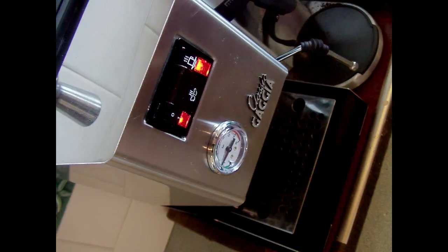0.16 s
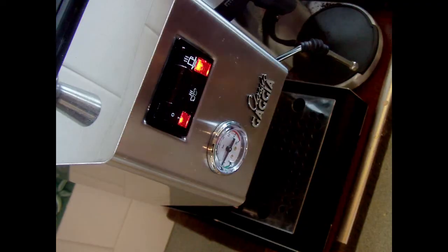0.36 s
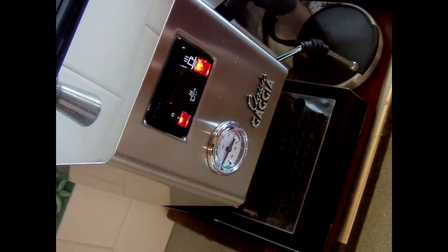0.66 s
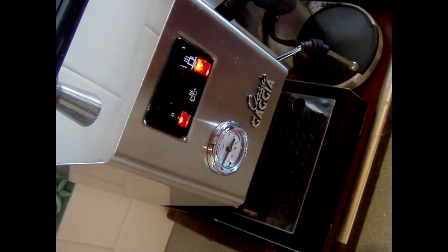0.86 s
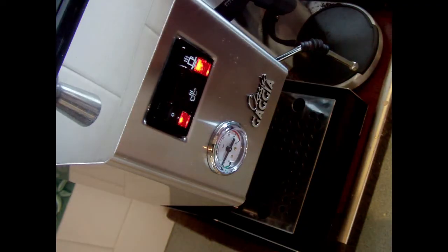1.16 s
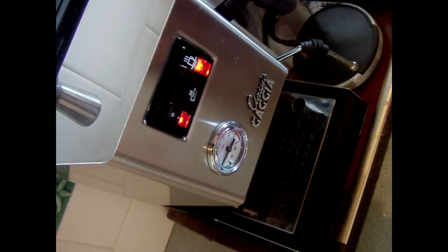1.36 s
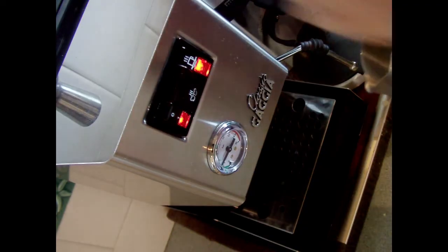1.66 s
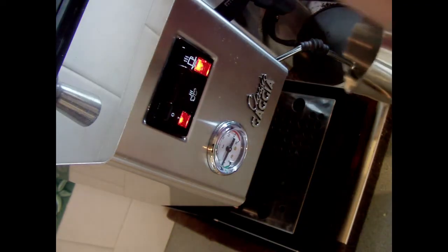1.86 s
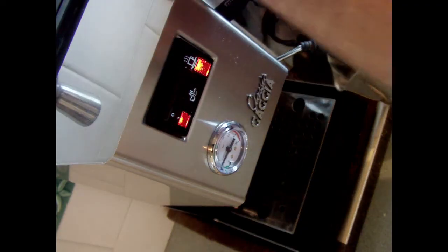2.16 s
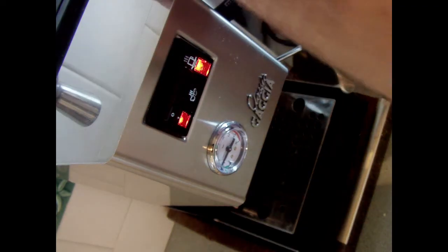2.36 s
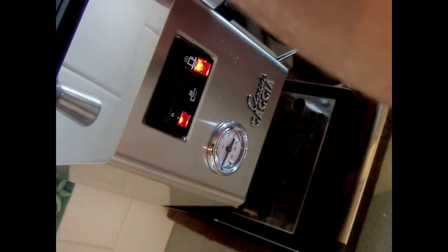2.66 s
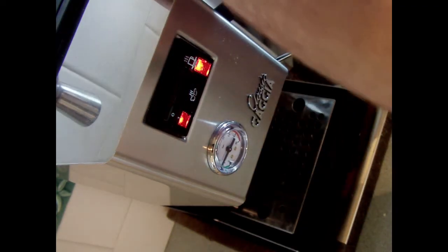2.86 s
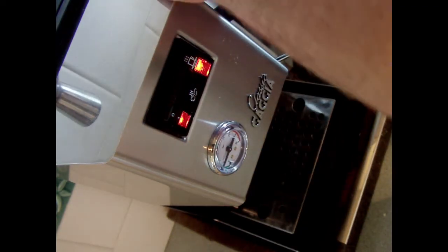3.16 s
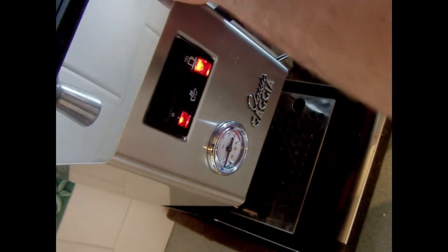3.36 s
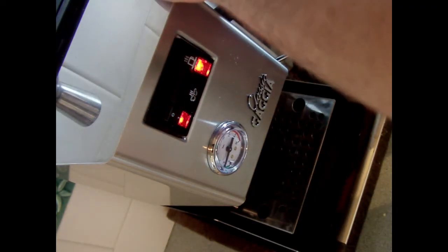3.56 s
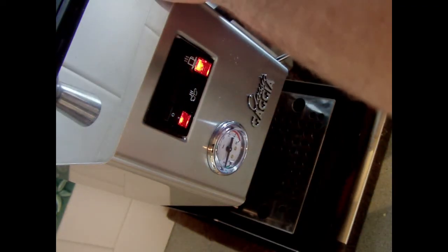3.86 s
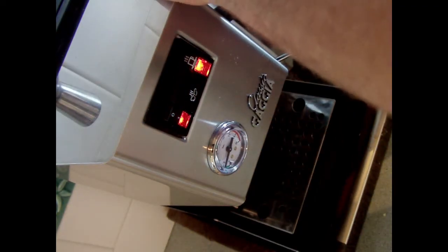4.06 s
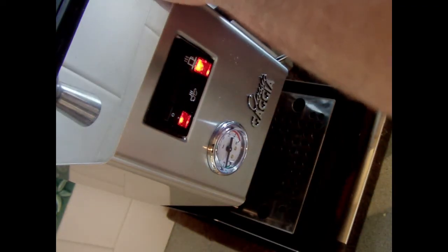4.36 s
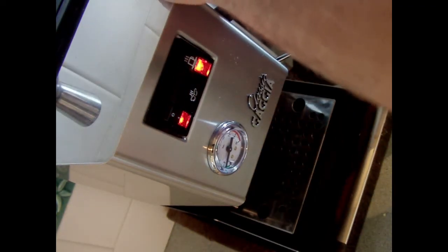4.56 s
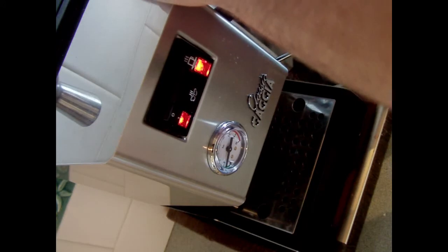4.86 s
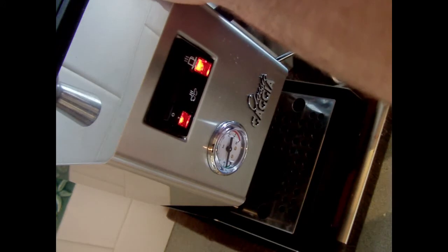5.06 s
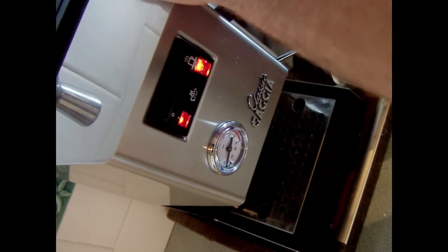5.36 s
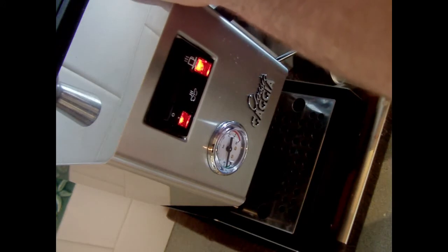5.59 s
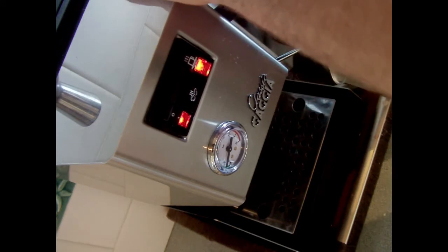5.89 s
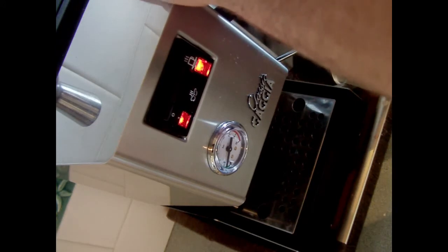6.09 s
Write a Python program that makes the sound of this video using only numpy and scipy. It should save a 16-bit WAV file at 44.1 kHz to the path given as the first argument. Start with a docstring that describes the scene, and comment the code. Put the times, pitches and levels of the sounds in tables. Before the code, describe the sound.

A quiet home kitchen with soft room noise. Faint clicks and dull knocks come first, then a brighter steel clink and a short scrape. A valve snaps and steam bursts into milk in a metal jug: choppy wet spits, shrieks and gurgles. The wand sinks and the sound becomes a dense rattle that softens, with hiss surging back near the end. Very close, nearly mono microphone, short room echo.

```python
"""Steam wand frothing milk

A steam wand froths milk in a steel jug in a kitchen, close up and nearly mono.
Filtered clatter and decaying steel modes knock; gated noise and darting resonances spit and hiss.
Clicks and short pips rattle as steam bubbles collapse in cold milk; clicks and noise drum on the jug's air.
Wobbling sines make large bubbles, filtered noise the quiet background, sparse echoes the kitchen."""
import sys
import numpy as np
from scipy import signal
from scipy.fft import rfft, irfft
from scipy.io import wavfile
from scipy.ndimage import uniform_filter1d, map_coordinates

SR = 44100
rng = np.random.default_rng(int(sys.argv[2]) if len(sys.argv) > 2 else 0)


def wrap_up_sound(samples):
    """Save the sound to the file named by the first command line argument, as 16-bit audio."""
    columns = np.atleast_2d(samples).T
    # keep every value between -1 and 1, then stretch to whole-number steps
    tamed = np.clip(columns, -1, 1)
    steps = np.round(tamed * 32767).astype(np.int16)
    wavfile.write(sys.argv[1], SR, steps)


N = 274743
T = np.arange(N) / SR
HZ = np.fft.rfftfreq(4096, 1 / SR)


def amp(db):
    """Decibels to gain."""
    return 10 ** (np.asarray(db) / 20)


def evened(x):
    """Scales to rms 1."""
    return x / np.sqrt(np.mean(x ** 2) + 1e-20)


def read(points, hz):
    """Interpolates a table on a log-frequency axis."""
    f, value = np.transpose(points)
    return np.interp(np.log(hz + 1), np.log(f + 1), value)


def add(mix, s, sound):
    """Mixes a sound in at time s."""
    part = mix[round(s * SR):][:len(sound)]
    part += sound[:len(part)]


def colour(x, db):
    """Minimum-phase filter shaped by dB on the HZ grid; the result has rms 1."""
    log_gain = np.log(amp(np.r_[db, db[-2:0:-1]]) + 1e-5)
    taps = np.fft.ifft(np.exp(np.conj(signal.hilbert(log_gain)))).real
    causal_taps = taps[:len(taps) // 2]
    return evened(signal.oaconvolve(x, causal_taps)[:len(x)])


def noise():
    """White noise over the whole scene."""
    return rng.standard_normal(N)


def wander(rate_hz):
    """Smooth random drift of rms 1, mostly slower than the given rate."""
    keep = 1 / (1 + (np.fft.rfftfreq(N, 1 / SR) / rate_hz) ** 4)
    return evened(irfft(rfft(noise()) * keep, N))


def flutter(rate_hz, depth_db):
    """Random gain of mean power 1."""
    return evened(amp(depth_db * 2 * np.tanh(wander(rate_hz) / 2)))


def swells(rows):
    """Gain of bell-shaped swells, from rows of middle, half length and dB."""
    return sum(amp(db) * np.exp(-((T - s) / half) ** 2) for s, half, db in rows)


def pops(per_s, spread_db):
    """Random clicks of uneven size and sign, rms 1."""
    size = amp(spread_db * np.minimum(rng.exponential(1, N), 3))
    sign = rng.choice([-1, 1], N)
    return evened(size * sign * (rng.random(N) < per_s / SR))


def squelch(centre_hz, octaves, width_hz):
    """A pocket swells and shrinks, so its narrow-band resonance darts up and down."""
    hz = centre_hz * 2 ** (octaves * np.tanh(wander(rate_hz=52)))
    return evened(wander(width_hz / 2) * np.cos(2 * np.pi * np.cumsum(hz) / SR))


def slosh(x, depth, rate_hz):
    """The milk heaves, so the resonances above it drift a little up and down."""
    positions = np.arange(N) + np.cumsum(depth * wander(rate_hz))
    return map_coordinates(x, [positions], order=3, mode="mirror")


# Air above the milk. Each row: resonance in Hz, width in Hz, boost in dB.
JUG_AIR_MODES = [(1755, 115, 6.5), (2595, 110, 5.5), (3694, 74, 5.5), (4090, 174, 8), (4760, 130, -1.5),
                 (5360, 310, 6)]


def in_jug(x, points):
    """A source's own colour, boosted at the resonances of the air in the jug."""
    air_db = sum(db / (1 + ((HZ - hz) / width) ** 2) for hz, width, db in JUG_AIR_MODES)
    return colour(x, read(points, HZ) + air_db)


# Kitchen noise spectrum. Each row: frequency in Hz, relative density in dB per Hz.
QUIET_COLOUR = [(30, -42), (100, -25.5), (200, -19.5), (330, -9), (600, -3), (1150, -2), (2200, -6),
                (5000, -18), (15500, -29)]
# Faint wide background noise. Each row: frequency in Hz, relative density in dB per Hz.
SIDE_NOISE_SPECTRUM = [(30, -9), (150, -10), (260, -6), (450, -35), (2500, -17), (6000, -8), (15000, -1.5)]
QUIET_DB, SIDE_NOISE_DB = -58.5, -75.5
WHINE_HZ, WHINE_PEAK_DB = 8000, -82.5


def background():
    """Steady filtered noise, a faint electronic sine whine and faint wide noise, opposite in left and right."""
    quiet = amp(QUIET_DB) * colour(noise(), read(QUIET_COLOUR, HZ))
    whine = amp(WHINE_PEAK_DB) * np.sin(2 * np.pi * WHINE_HZ * T)
    side_noise = amp(SIDE_NOISE_DB) * colour(noise(), read(SIDE_NOISE_SPECTRUM, HZ))
    return quiet + whine + side_noise * np.array([[1], [-1]])


# Jug wall modes. Each row: frequency in Hz, level in dB, t60 in seconds.
STEEL_MODES = [(1146, 3, 0.053), (1346, -6.5, 0.84), (2035, -14, 0.4), (2190, -7, 0.25), (3025, -3, 0.18),
               (3520, 0, 0.21), (3983, 1, 0.17), (4240, -6, 0.18), (4765, -1, 0.2), (4900, 9, 0.044)]


def steel(t):
    """The ring of the jug wall after a blow: a sum of decaying modes."""
    return sum(amp(db - 60 * t / t60) * np.sin(2 * np.pi * hz * t) for hz, db, t60 in STEEL_MODES)


# Knocks of jug, wand and valve.
# Each row: start in seconds, level in dB, centre in Hz, width in octaves, clatter t60 in seconds.
KNOCK_EVENTS = [(0.354, -45.5, 1470, 0.5, 0.08), (1.18, -53, 480, 0.78, 0.13),
                (1.192, -48.5, 510, 0.8, 0.19), (1.232, -45.5, 510, 0.67, 0.086),
                (1.203, -61.5, 8050, 0.65, 0.068), (1.413, -50, 2580, 0.22, 0.13),
                (2.17, -44, 4320, 0.71, 0.097), (2.486, -33, 3990, 0.96, 0.13),
                (2.487, -39, 1220, 0.51, 0.18), (2.574, -51, 8450, 0.46, 0.1),
                (2.83, -32.5, 2580, 0.26, 0.031)]
# The jug rubs against the wand. Each row: middle in seconds, half length in seconds, drive in dB.
RUB_SWELLS = [(2.335, 0.02, -54.5), (2.395, 0.035, -52)]
# The rubbed wall sings on one mode. Each row: middle in seconds, half length in seconds, level in dB.
SING_SWELLS = [(2.44, 0.049, -60)]
SING_HZ = 3025
# hard, bright blows ring the steel fully; duller ones ring it less
RING_DB, RING_HZ, RING_DB_PER_OCTAVE = -5.5, 4060, 20
SCRAPE_COLOUR = [(200, -20), (1600, 3.5), (5000, -15.5), (14000, -25)]  # Hz, relative dB per Hz


def handling():
    """Each knock is a short clatter plus ringing steel; sliding rubs the same modes."""
    out, t = np.zeros(N), np.arange(SR // 2) / SR
    ring = steel(t)
    onset = 1 - np.exp(-t / 0.00026)
    for s, db, hz, octaves, t60 in KNOCK_EVENTS:
        skirts = (np.log2((HZ + 1) / hz) / octaves) ** 4
        treble_loss = (HZ / hz / 0.99) ** 2
        band_db = -15 * np.log10(1 + skirts + treble_loss)
        clatter = colour(rng.standard_normal(len(t)), band_db) * amp(-60 * t / t60)
        ring_db = RING_DB + RING_DB_PER_OCTAVE * min(np.log2(hz / RING_HZ), 0)
        add(out, s, amp(db) * (clatter + amp(ring_db) * ring) * onset)
    rub = pops(per_s=1700, spread_db=-1.5)
    rubbed_steel = evened(signal.oaconvolve(rub, ring)[:N])
    scrape = amp(-11.5) * rubbed_steel + amp(1.5) * colour(rub, read(SCRAPE_COLOUR, HZ))
    singing = evened(np.sin(2 * np.pi * SING_HZ * T))
    return out + scrape * swells(RUB_SWELLS) + singing * swells(SING_SWELLS)


# The milk heaves and gulps air. Each row: middle in seconds, half length in seconds, level in dB.
GULP_SWELLS = [(2.86, 0.036, -52), (2.98, 0.051, -41.5), (3.19, 0.17, -40.5), (3.37, 0.085, -35),
               (3.9, 0.14, -49.5), (4.13, 0.035, -37), (4.95, 0.012, -45.5), (5.26, 0.049, -42),
               (5.53, 0.029, -41.5)]
# Drumming spectrum. Each row: frequency in Hz, relative density in dB per Hz.
CHURN_SPECTRUM = [(50, -32), (300, -32.5), (480, -29.5), (600, -12), (680, -19.5), (775, 5), (880, -0.5),
                  (980, -4), (1120, -2), (1250, -11), (2200, -15), (6000, -100)]
SIMMER_DB = -54  # churn that is always there while steam flows
JET_CHURN_DB = -7  # re jet_level()
GURGLE_HZ, GURGLE_DB = 786, -5  # wandering air-pocket resonance, level re the gulp


def churn():
    """Bursting air pockets drum on the hollow of the jug, harder with the jet; each gulp adds a gurgle."""
    drive = pops(per_s=500, spread_db=1.5) + amp(8) * noise()
    drive = drive * flutter(rate_hz=18.0, depth_db=4.0)
    gulps = swells(GULP_SWELLS)
    simmer = amp(SIMMER_DB) * valve()
    stirred = amp(JET_CHURN_DB) * jet_level()
    strength = np.sqrt(simmer ** 2 + stirred ** 2 + gulps ** 2)
    drumming = slosh(in_jug(drive, CHURN_SPECTRUM), depth=.02, rate_hz=4.987)
    gurgle = amp(GURGLE_DB) * gulps * squelch(GURGLE_HZ, octaves=0.11, width_hz=77)
    return strength * drumming + gurgle


# Air pushed out ahead of the steam. Each row: middle in seconds, half length in seconds, level in dB.
PUFF_SWELLS = [(2.87, 0.04, -55.5)]
# Wand air spectrum. Each row: frequency in Hz, relative density in dB per Hz.
WAND_SPECTRUM = [(300, -23), (1400, -6), (4300, -2), (7000, -8), (16000, -20)]
WAND_HZ, WAND_PEAK_DB = 1424, 23  # lowest tube resonance, boost at its overtones


def wand_air():
    """Air hisses through the wand, coloured by the overtones of its tube."""
    overtones_db = WAND_PEAK_DB * np.cos(np.pi * HZ / WAND_HZ) ** 10
    return swells(PUFF_SWELLS) * colour(noise(), read(WAND_SPECTRUM, HZ) + overtones_db)


# Wet spurts of steam. Each row: start in seconds, end in seconds, hiss drive in dB, shriek drive in dB,
# steam-pocket pitch at the start in Hz, pitch at the end in Hz.
SPURT_EVENTS = [(2.83, 2.838, -39, -25.5, 2580, 4600), (2.975, 3.005, -46.5, -29, 3020, 4300),
                (3.019, 3.044, -50, -27.5, 3300, 2800), (3.051, 3.091, -46.5, -26, 3000, 2650),
                (3.097, 3.113, -36.5, -24, 2600, 3200), (3.114, 3.14, -36.5, -24, 4200, 3600),
                (3.148, 3.188, -34, -24, 3300, 2600), (3.243, 3.255, -42, -25.5, 4488, 3800),
                (3.261, 3.273, -36, -23, 5200, 5700), (3.285, 3.336, -37, -22, 3700, 2700),
                (3.337, 3.388, -32.5, -20.5, 3800, 5400), (3.409, 3.431, -37.5, -26, 5660, 5400),
                (3.435, 3.46, -48, -23.5, 3800, 4900), (3.513, 3.531, -36.5, -23.5, 3177, 2850),
                (3.545, 3.573, -39, -23.5, 4310, 3000), (3.599, 3.629, -56, -27, 3207, 2500),
                (3.641, 3.662, -34, -24, 5600, 3900), (3.708, 3.769, -31.5, -43, 4030, 5500),
                (3.855, 3.881, -55, -28.5, 4240, 2900), (3.889, 3.905, -55, -34, 3125, 2650),
                (4.934, 4.957, -45.5, -45, 2275, 2600), (5.274, 5.288, -37.5, -32.5, 2700, 3600)]
# large, low-pitched pockets collapse hardest
SPURT_RATTLE_DB, SPURT_RATTLE_HZ, RATTLE_DB_PER_OCTAVE = -5, 2850, -13.5


def spurt_gates(rise_s=0.001, fall_s=0.0086):
    """Slugs of water open and choke the nozzle: gains of hiss, shriek and rattle."""
    gates = np.zeros((3, N))
    for start, end, hiss_db, shriek_db, start_hz, end_hz in SPURT_EVENTS:
        hz = (start_hz + end_hz) / 2
        opening = 1 - np.exp(-np.maximum(T - start, 0) / rise_s)
        choking = np.exp(-np.maximum(T - end, 0) / fall_s)
        rattle_db = shriek_db + SPURT_RATTLE_DB + RATTLE_DB_PER_OCTAVE * np.log2(hz / SPURT_RATTLE_HZ)
        gates = np.maximum(gates, amp([[hiss_db], [shriek_db], [rattle_db]]) * opening * choking)
    return gates


def pocket_pitch():
    """The steam pocket's resonance in Hz glides through each spurt and on to the next."""
    rows = np.array(SPURT_EVENTS)
    return np.interp(T, np.sort(rows[:, :2].ravel()), rows[:, 4:].ravel())


VALVE_S, VALVE_RISE_S = 2.97, 0.078  # the steady flow starts


def valve():
    """How far the steam valve is open, 0-1."""
    return np.clip((T - VALVE_S) / VALVE_RISE_S, 0, 1)


# Jet, loud when the tip nears the surface. Each row: time in seconds, drive in dB.
JET_DRIVE = [(3.5, -45.5), (3.78, -40.5), (3.84, -46), (3.93, -57), (4.37, -54), (4.39, -42.5), (4.78, -44),
             (4.79, -50), (4.93, -53.5), (4.95, -49), (5.03, -46.5), (5.29, -32), (5.39, -42.5),
             (5.5, -32.5), (5.69, -40.5), (5.82, -37.5), (6.15, -44.5), (6.2, -39.5)]


def jet_level():
    """Drive gain of the steady jet."""
    return valve() * amp(np.interp(T, *np.transpose(JET_DRIVE)))


# Hiss spectrum. Each row: frequency in Hz, relative density in dB per Hz.
JET_SPECTRUM = [(30, -16.5), (200, -16), (600, -8.5), (1400, -9.5), (1900, -16.5), (3500, -7.5), (4700, -4),
                (5800, 0), (10000, 4), (16000, -2.5)]
# Shriek noise spectrum. Each row: frequency in Hz, relative density in dB per Hz.
SHRIEK_SPECTRUM = [(100, -15.5), (1200, -6.5), (1900, -10), (2600, 8), (4700, 2.5), (5400, 6.5), (9000, 1),
                   (16000, -35)]
# Steam-pocket spectrum. Each row: frequency in Hz, relative density in dB per Hz.
POCKET_SPECTRUM = [(1500, -14), (2400, 0.5), (6000, -2.5)]
# Low noise that widens the jet. Each row: frequency in Hz, relative density in dB per Hz.
WIDTH_SPECTRUM = [(60, 11), (300, 11), (650, 9.5), (1100, -11), (12000, -88)]


def jet(hiss_gate, shriek_gate):
    """Turbulent steam at the nozzle, with fine spray, and a wet shriek during the spurts."""
    flow = np.hypot(amp(-1.0) * jet_level(), amp(4) * hiss_gate)
    flow = flow * flutter(rate_hz=107, depth_db=2.5)
    spray = np.zeros(N)
    for hz in (7000, 9500, 12500):
        spray += squelch(hz, octaves=0.23, width_hz=48) * flutter(rate_hz=16, depth_db=12)
    hiss = flow * in_jug(noise() + amp(-18.5) * spray, JET_SPECTRUM)

    pockets = squelch(pocket_pitch(), octaves=0.2, width_hz=300)
    chop = flutter(rate_hz=130, depth_db=2.5)
    breath = amp(-9) * in_jug(noise(), SHRIEK_SPECTRUM)
    cry = amp(-5.5) * in_jug(pockets, POCKET_SPECTRUM)
    shriek = shriek_gate * chop * (breath + cry)

    # a little low noise, opposite in left and right, widens the jet
    width = amp(-52.5) * np.sqrt(flow) * colour(noise(), read(WIDTH_SPECTRUM, HZ))
    return hiss + shriek + np.array([width, -width])


def pips(hz, per_s, cycles):
    """Small bubbles of one size, each sounding for a few cycles."""
    t = np.arange(0, cycles / hz, 1 / SR)
    pip = np.hanning(len(t)) * np.sin(2 * np.pi * hz * t)
    return signal.oaconvolve(pops(per_s, spread_db=2), pip)[:N]


# The rattle surges. Each row: middle in seconds, half length in seconds, drive in dB.
SURGE_SWELLS = [(4.02, .018, -45), (4.15, 0.15, -33), (4.83, 0.042, -36.5), (5.005, 0.015, -37.5),
                (5.1, 0.034, -39.5)]
# Rattle spectrum. Each row: frequency in Hz, relative density in dB per Hz.
COLLAPSE_SPECTRUM = [(50, -61), (300, -46), (1300, -23), (1800, -18), (2200, -14), (2450, -8), (2600, 1),
                     (3050, 0.5), (3400, -8), (4100, -10.5), (5500, -15), (8000, -26.5), (16000, -61)]
SUNK_S, SINK_S = 3.82, 0.03  # the tip sinks under the milk; a steady rattle takes over from the spurts
COLD_DRIVE_DB, WARM_DRIVE_DB, WARM_UP_S = -30.5, -43, 0.63  # the rattle fades as the milk warms
JET_RATTLE_DB = -9.5  # drive re jet_level()


def collapse(rattle_gate, pips_db=-1, small_db=-8):
    """Steam bubbles implode in the cold milk: a dense rattle with separate pips standing out."""
    drive = pops(per_s=970, spread_db=0.0) + amp(2.5) * noise()
    drive = drive * flutter(rate_hz=15, depth_db=1.5)
    rattle = slosh(in_jug(drive, COLLAPSE_SPECTRUM), depth=.015, rate_hz=5.97)
    singles = evened(sum(pips(hz, per_s=40, cycles=13) for hz in np.geomspace(2520, 3100, 7)))
    small = evened(sum(pips(hz, per_s=30, cycles=14) for hz in np.geomspace(3200, 4200, 5)))

    sunk = (1 + np.tanh((T - SUNK_S) / SINK_S)) / 2
    cold = sunk * np.exp(-np.maximum(T - SUNK_S, 0) / WARM_UP_S)
    steady = valve() * amp(WARM_DRIVE_DB + (COLD_DRIVE_DB - WARM_DRIVE_DB) * cold)
    steady = steady * flutter(rate_hz=8.2, depth_db=0.87)
    stirred = amp(JET_RATTLE_DB) * jet_level()
    strength = np.sqrt(steady ** 2 + swells(SURGE_SWELLS) ** 2 + rattle_gate ** 2 + stirred ** 2)

    violence = np.minimum(strength / amp(-37), 1) ** .5  # weak collapse gives few loud pips
    singles = singles + amp(small_db) * (1 - cold) * small  # smaller bubbles join as the milk warms
    return amp(-2) * strength * (rattle + amp(pips_db) * violence * singles)


# Large single bubbles. Each row: middle in seconds, half length in seconds, level in dB, pitch in Hz.
BUBBLE_EVENTS = [(2.892, 0.022, -44.5, 767), (2.956, .027, -38.5, 780), (3.04, 0.0045, -19, 2860),
                 (3.179, 0.026, -27.5, 796), (3.229, 0.031, -43.5, 588), (3.396, 0.021, -32, 1104),
                 (3.412, .016, -29.5, 849), (3.496, .024, -29, 778.5), (3.616, 0.036, -36.5, 1830),
                 (3.695, .014, -31.5, 865), (3.859, 0.0044, -16, 2644), (3.888, 0.0057, -20, 3025),
                 (3.897, .007, -20.5, 2690), (5.175, 0.034, -37, 800), (5.682, 0.018, -33.5, 2620)]


def bubbles(waver=0.045):
    """A large bubble rings briefly, its pitch wobbling as it changes shape."""
    out = np.zeros(N)
    for s, half, db, hz in BUBBLE_EVENTS:
        t = np.arange(-half, half, 1 / SR)
        drift = uniform_filter1d(rng.standard_normal(SR // 4), int(2 * SR / hz))
        wobble = evened(drift)[:len(t)]
        tone = np.sin(2 * np.pi * np.cumsum(hz * (1 + waver * wobble)) / SR)
        add(out, s - half, np.sqrt(2) * amp(db) * np.hanning(len(t)) ** 2 * tone)
    return out


# The tip whistles faintly. Each row: middle in seconds, half length in seconds, level in dB.
WHISTLE_SWELLS = [(4.5, 0.051, -45), (4.71, 0.058, -45.5)]
WHISTLE_HZ = 1794


def whistle():
    """The submerged tip gives short, wavering whistles."""
    return swells(WHISTLE_SWELLS) * squelch(WHISTLE_HZ, octaves=0.0441, width_hz=83)


# Reverberation. Each row: frequency in Hz, t60 in seconds.
KITCHEN_T60 = [(200, 0.53), (1500, 0.91), (5000, 0.48), (15000, 0.019)]


def kitchen(x, early_db=-8.0, tail_db=-15):
    """Close reflections from jug and machine, then a short tail that dies faster in the high treble."""
    size = SR // 2
    t = np.arange(size) / SR
    taps = rng.standard_normal(size) * (rng.random(size) < 3000 / SR) * (t > .008)
    hz, times, z = signal.stft(taps, SR, nperseg=256)
    decay = amp(-60 * times / read(KITCHEN_T60, hz)[:, None])
    tail = signal.istft(z * decay, SR, nperseg=256)[1][:size]
    early = np.zeros(size)
    delays_s = rng.uniform(.0015, .007, size=10)
    early[(SR * delays_s).astype(int)] = rng.choice([-1, 1], size=10)
    # small surfaces return mostly treble
    early = signal.lfilter(*signal.butter(1, 2500, "high", fs=SR), early)
    echo = amp(early_db) * early / np.linalg.norm(early) + amp(tail_db) * tail / np.linalg.norm(tail)
    return x + signal.fftconvolve(x, echo[None], axes=1)[:, :N]


def scene():
    """All sources in the kitchen, over its steady quiet background."""
    floor = background()
    hiss_gate, shriek_gate, rattle_gate = spurt_gates()
    sources = handling() + churn() + wand_air() + jet(hiss_gate, shriek_gate)
    sources = sources + collapse(rattle_gate) + bubbles() + whistle()
    return kitchen(sources) + floor


EDGE_HZ = 15900


def record(dry):
    """The recorder's band limit: a linear-phase low-pass."""
    taps = signal.firwin(511, EDGE_HZ, window=("kaiser", 9), fs=SR)
    return signal.oaconvolve(dry, taps[None], "same")


dry = scene()
out = record(dry)
wrap_up_sound(out)
```